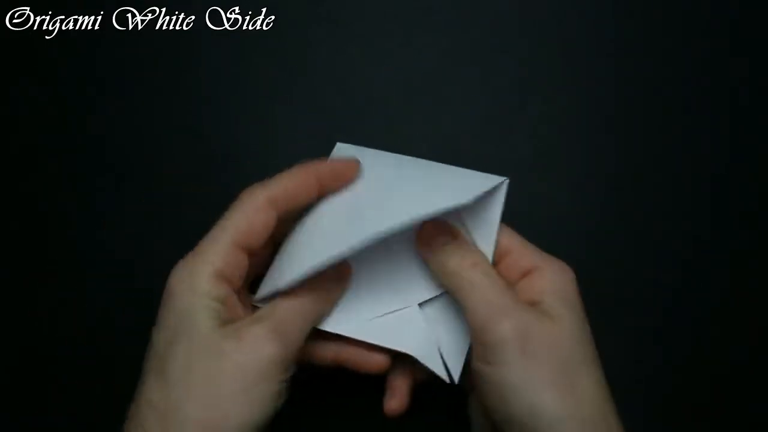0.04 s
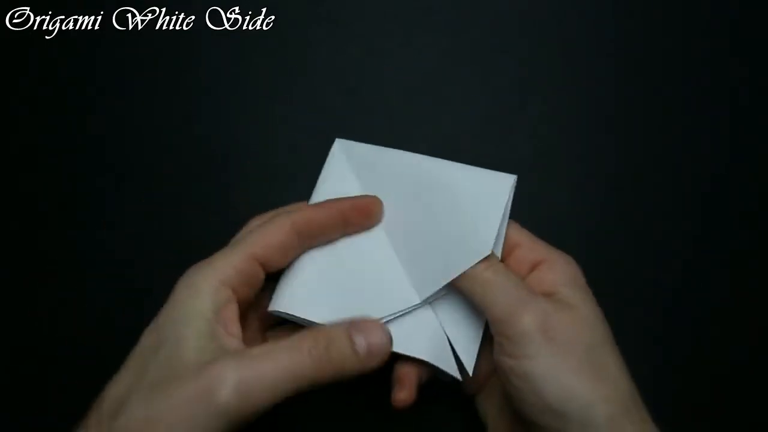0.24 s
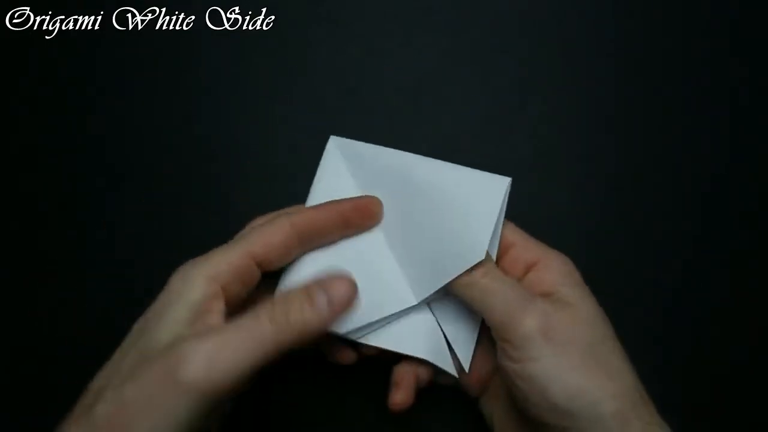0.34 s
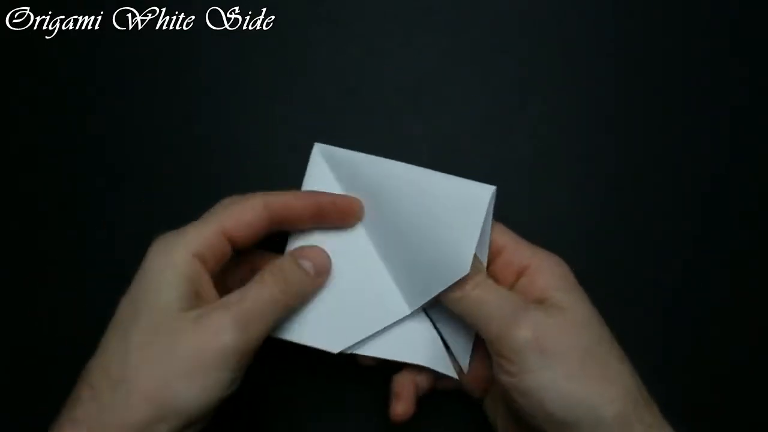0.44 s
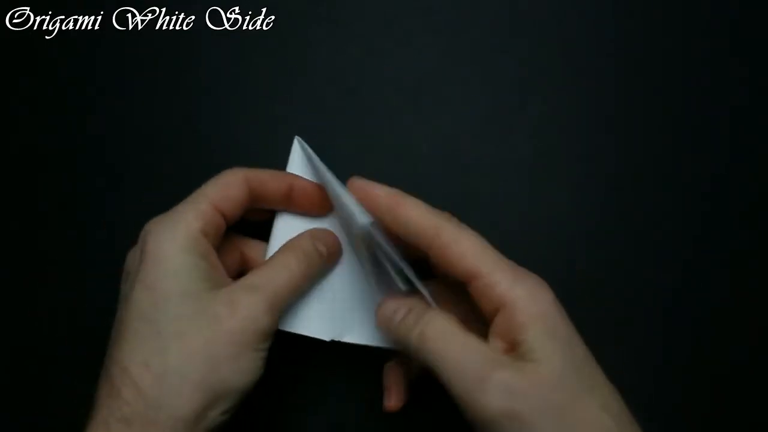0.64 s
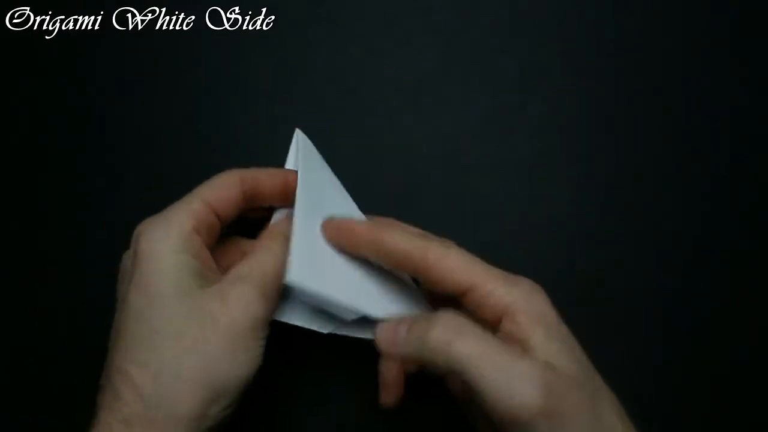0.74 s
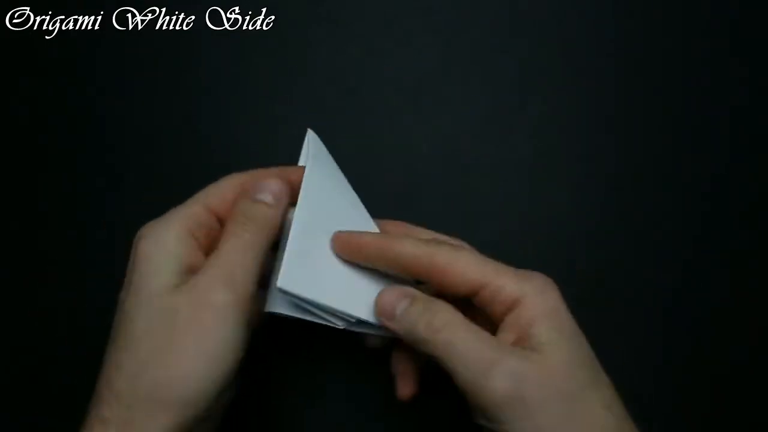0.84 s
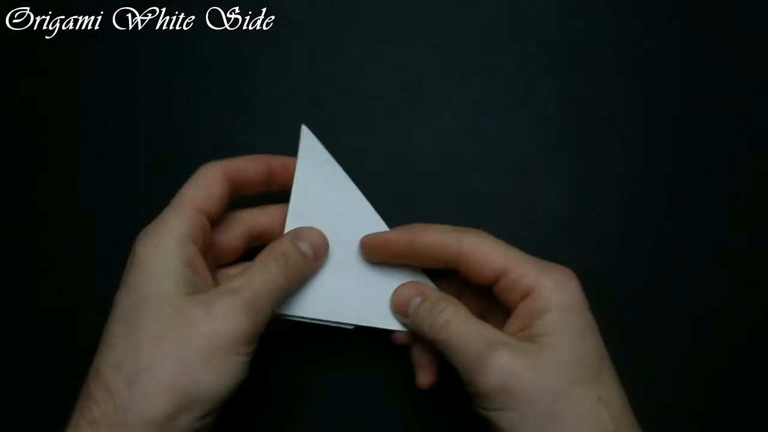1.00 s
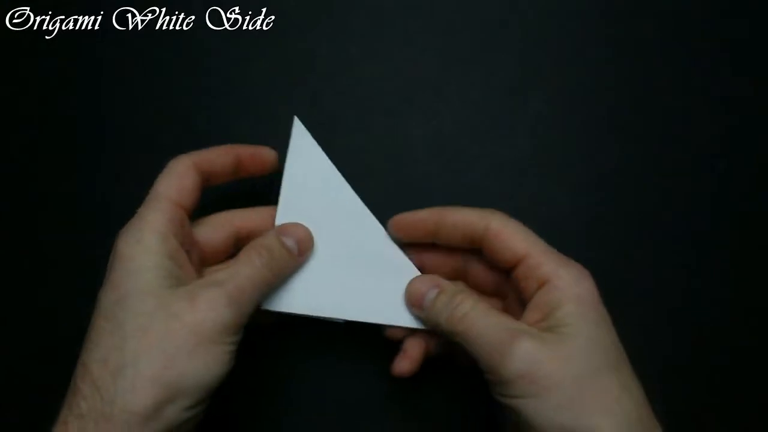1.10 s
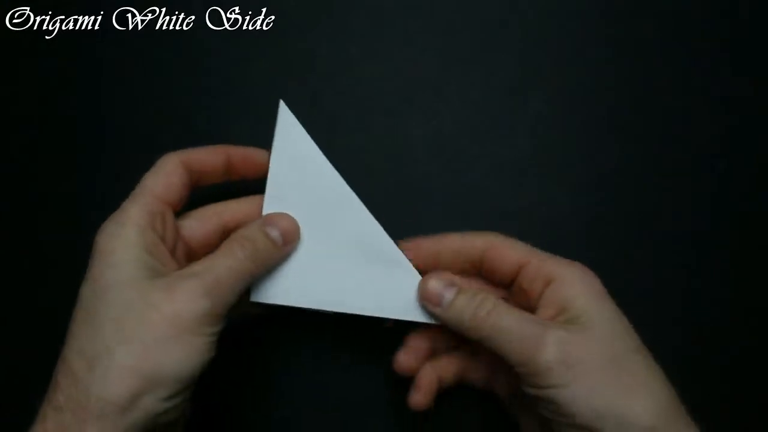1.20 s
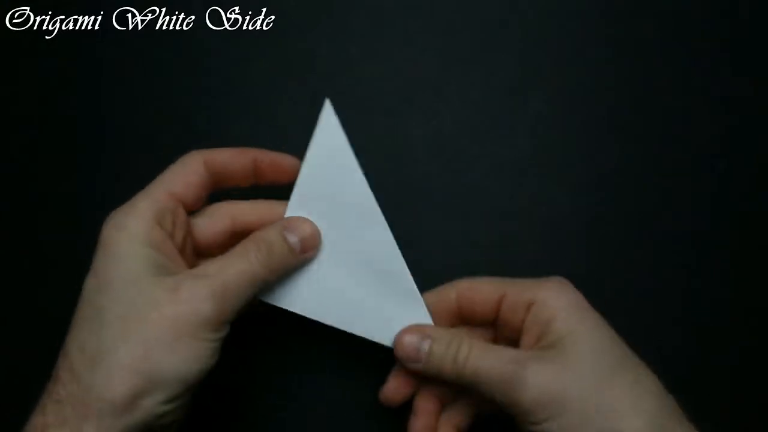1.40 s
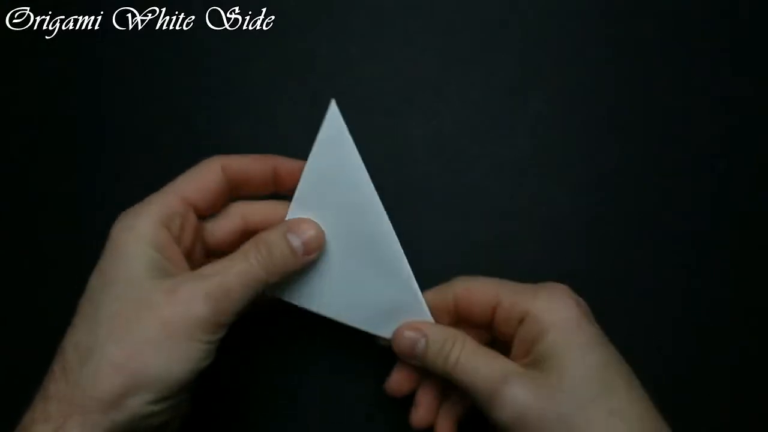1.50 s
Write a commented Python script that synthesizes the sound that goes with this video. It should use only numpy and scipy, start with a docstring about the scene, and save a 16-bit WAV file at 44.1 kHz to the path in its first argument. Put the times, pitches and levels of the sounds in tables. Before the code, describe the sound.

Paper crinkling and snapping as hands squeeze and refold a small folded paper shape

```python
"""In a small quiet room, a folded paper toy is squeezed shut and refolded by hand, close to the microphone.
Sliding skin and paper hiss as grainy filtered noise; wrinkles crackle, and finger pads tap the open pocket.
Broad panels flex with soft low plops, creases buckle in dry snaps (a kick and a rattle heard through a panel);
the loudest is a flap popping through. Flaps scuff as swelling noise, the hollow fold knocks as three decaying
tones, tight layers squeak as wavering tones. Narrow peaks colour it all, over a short room and faint noise."""
import sys
import numpy as np
from scipy import signal
from scipy.fft import rfft, irfft, next_fast_len
from scipy.io import wavfile
from scipy.ndimage import map_coordinates

SR = 44100
rng = np.random.default_rng(int(sys.argv[2]) if len(sys.argv) > 2 else 0)


def master(y):
    """Save y as 16-bit WAV."""
    cut = np.clip(np.atleast_2d(y).T, -1, 1)
    pcm = np.round(cut * 32767)  # scale
    wavfile.write(sys.argv[1], SR, pcm.astype(np.int16))


N = 68355  # length in samples

# All handling levels are ahead of the shared colour peaks, which change them further.
# Treble of the sliding, before its unsteadiness. Each row: time in seconds, level in dB.
SLIDE_HISS_LEVEL = [(0, -48), (.03, -55.5), (.06, -61.5), (.125, -61.5), (.155, -48.5), (.27, -47),
                    (.335, -39), (.362, -41), (.385, -50), (.455, -67), (.48, -56.5), (.525, -52.5),
                    (.555, -42), (.595, -52.5), (.63, -44), (.655, -51.5), (.68, -46.5), (.795, -43.5),
                    (.815, -51.5), (.94, -49), (.975, -46.5), (1.03, -52), (1.09, -48.5), (1.12, -53),
                    (1.17, -44.5), (1.21, -50.5), (1.265, -55.5), (1.3, -55.5), (1.325, -72), (1.4, -73.5),
                    (1.445, -63), (1.5, -67.5), (1.55, -60.5)]
# Middle range of the sliding, before its unsteadiness. Each row: time in seconds, level in dB.
SLIDE_BODY_LEVEL = [(0, -52), (.035, -54), (.06, -64.5), (.12, -67), (.165, -46), (.24, -44), (.3, -47),
                    (.34, -39.5), (.38, -43), (.42, -52.5), (.452, -59), (.49, -46.5), (.595, -46),
                    (.63, -43), (.655, -47), (.675, -42), (.73, -48), (.8, -38), (.825, -52), (.93, -50.5),
                    (.98, -45.5), (1.04, -54), (1.065, -48.5), (1.14, -46), (1.2, -42.5), (1.24, -67),
                    (1.29, -54), (1.335, -66.5), (1.385, -75), (1.45, -61.5), (1.51, -71), (1.55, -70.5)]
# Low rustle of the open pocket, before its unsteadiness. Each row: time in seconds, level in dB.
SLIDE_HOLLOW_LEVEL = [(0, -47), (.046, -52), (.115, -57), (.16, -52), (.22, -51.5), (.3, -55.5),
                      (.345, -40.5), (.372, -36.5), (.41, -51), (.48, -81), (.53, -57.5), (.555, -56.5),
                      (.61, -47.5), (.66, -57), (.75, -60.5), (.8, -50), (.83, -62.5), (.96, -51),
                      (1.1, -73), (1.22, -54), (1.38, -73), (1.55, -69)]
# Spectra of those three layers. Each row: frequency in Hz, relative density in dB per Hz.
HISS_SPECTRUM = [(100, -64), (2500, -32), (4500, -2), (5800, 2.5), (7500, 3.5), (10000, 2.5), (13000, 3),
                 (15000, -4), (16000, -14.5)]
BODY_SPECTRUM = [(60, -46.5), (200, -35.5), (600, -22.5), (1200, -9), (1700, 0.5), (2300, 0.5),
                 (2750, -1.5), (3150, 2.5), (4000, 0), (5000, -8), (8000, -38)]
HOLLOW_SPECTRUM = [(60, -32), (200, -35), (340, -10), (480, -8.5), (600, -11.5), (740, -5.5), (1020, -3.5),
                   (1400, -4), (1900, -7), (2400, -19), (6000, -45.5)]
GRAINS_PER_S, GRAIN_SPREAD_DB = 1800, 3
GRAIN_SHARE = 0.33  # share of the friction's power, before its spectrum

# Tiny crackles, their level set against the middle range of the sliding.
CRACKLE_DB, CRACKLE_SPREAD_DB, CRACKLE_HZ, CRACKLE_OCTAVES = 14, 4, 2400, 0.52

# Finger pads on the open pocket. Each row: start in seconds, level in dB, tilt in dB per octave
# (from 500 to 2000 Hz), t60 of the flutter in seconds.
TAPS = [(.0507, -40, -7.5, 0.0074), (.0657, -39.5, -9, 0.0072), (.088, -35.5, -5, 0.024),
        (0.1322, -41.5, 4, 0.0094), (.151, -35.5, 14, .015), (1.4642, -44, 8, 0.016)]
# A soft pad gives no treble. Each row: frequency in Hz, gain in dB.
TAP_SPECTRUM = [(150, -36), (540, -47), (760, 10.5), (1800, 10.5), (2250, -23), (6000, -42)]
TAP_RATTLE_DB = -0.5  # against the kick

# Panels flexing; the broader, the lower. Each row: start in seconds, level in dB, pitch in Hz.
PLOPS = [(.088, -49.5, 310), (0.133, -51.5, 330), (.151, -38, 388), (0.2332, -31, 351), (0.327, -39, 357),
         (.358, -31.5, 642), (0.544, -39.5, 363), (0.606, -52, 577), (.677, -44, 633), (0.78, -54, 366),
         (0.797, -50.5, 355), (.958, -34, 661), (1.219, -45, 766)]
PLOP_SWELL_S, PLOP_ROUGH_RAD = 0.0039, 0.24
PUFF_DB, PUFF_T60_S = -26.5, 0.13  # level against the plop
# Air squeezed out of the folds. Each row: frequency in Hz, relative level in dB.
PUFF_SPECTRUM = [(25, -28), (60, -13.5), (130, 7.5), (200, -3.5), (320, 8.5), (600, -9), (2000, -68.5)]

# Crease snaps. Each row: time of the kick in seconds, level in dB, panel pitch in Hz, sharpness Q,
# crack against the panel in dB, rattle against the kick in dB, t60 of the rattle in seconds.
SNAPS = [(0.2083, -29.5, 1820, 6.6, -23, -9, 0.0081), (0.2131, -28.5, 1020, 0.71, -20, 5.5, 0.024),
         (0.2315, -29, 1555, 2.1, -8, 7, 0.012), (.234, -32, 2400, 1.3, -23, 26, 0.028),
         (0.258, -34.5, 1150, 1.9, -30, 31, 0.014), (0.346, -25.5, 1890, 0.85, -24, 7, 0.03),
         (.3575, -17.5, 1180, 1.78, -24, -16, 0.009), (.544, -27.5, 1600, 0.78, -36, -2, 0.006),
         (0.5541, -30.5, 2680, 1.04, -14, 1, 0.0095), (0.5795, -29, 1800, 0.64, -16, 0.5, 0.017),
         (0.6791, -37, 1900, 0.62, -11, -5, 0.0071), (0.851, -38.5, 1520, 1.5, -16, -4.5, 0.02),
         (.878, -25.5, 1550, 0.86, -18, -1, 0.0077), (0.9146, -37, 2450, 1.3, -4.5, -5, 0.013),
         (0.959, -11.5, 2210, 5.7, -4.5, 4, 0.016), (0.9597, -15, 1370, 2.85, -3.5, 7.5, 0.0086),
         (1.0665, -41, 1800, 3.7, -9, 18, 0.013), (1.159, -29, 3020, 1.02, -28, -2.5, 0.004),
         (1.16, -35, 1200, 2.5, -5, 5.5, 0.015), (1.2128, -29, 1140, 2.9, -5.5, 3, 0.028),
         (1.2145, -28, 2740, 2.1, -14, -9, 0.013), (1.2333, -23.5, 2640, 2.2, -8, 5, 0.013),
         (1.2499, -24.5, 2400, 1.17, -18.5, -4.5, 0.019), (1.4216, -46, 3080, 8.2, -12, 2, 0.016)]
# Broad crack of the sheet. Each row: frequency in Hz, gain in dB.
CRACK_SPECTRUM = [(100, -40.5), (400, -33.5), (720, -4), (1020, -5), (1400, -7.5), (3000, -5), (4200, 1.5),
                  (6000, -5), (9000, -3), (13000, -10), (16000, -26)]
# How a small panel radiates. Each row: frequency in Hz, gain in dB.
RADIATION = [(50, -29), (300, -9.5), (500, -1.5), (750, 4), (4000, 4), (12000, 6.5)]
HIT_FRAME_S, RATTLE_RISE_S = 0.002, 0.0008  # snap and tap levels are rms over this frame
STRAIN_DB, STRAIN_S = -14, 0.0018  # fibres giving way before a snap: level against the kick, growth time

# Flaps passing each other. Each row: release in seconds, rise in seconds, level in dB, panel pitch in Hz,
# sharpness Q, crack against the panel in dB.
SCUFFS = [(0.34, 0.0051, -39, 2220, 4.4, -17), (0.348, 0.0045, -37, 1280, 1.8, 1),
          (.363, 0.016, -22, 1186, 2, -14.5), (.366, 0.02, -24, 2850, 2.6, -4.5),
          (0.3868, .009, -31, 1670, 1.7, -26), (.551, 0.014, -32, 1820, 0.81, -33),
          (0.797, 0.014, -29, 2750, 1.23, -6), (.799, 0.01, -40, 913, 4.7, -38.5),
          (0.876, 0.0063, -39, 1090, 1.4, -10.5)]
RELEASE_S = 0.012  # t60 after a scuff or squeak lets go

# Knocks on the hollow fold. Each row: start in seconds, level in dB, pitch as a ratio to the modes.
KNOCKS = [(.546, -30, 1.01), (.578, -36.5, 1.03), (1.2115, -42, .99)]
# Modes of the hollow fold. Each row: frequency in Hz at ratio 1, relative level in dB, t60 in seconds.
FOLD_MODES = [(736, -0.5, 0.044), (1007, -5.5, 0.042), (1328, -1, 0.052)]

# Paper squeaking on paper. Each row: release in seconds, rise in seconds, level in dB, mean pitch in Hz,
# waver as a share of the pitch.
SQUEAKS = [(0.793, 0.019, -31.5, 3084, .05), (1.425, 0.034, -64, 3030, 0.0058),
           (1.468, 0.042, -57.5, 3180, 0.033), (1.534, 0.076, -77, 4490, .002)]
SQUEAK_WAVER_PER_S, SQUEAK_OVERTONE_DB = 810, -18

# Narrow lifts in the colour of all handling. Each row: frequency in Hz, lift in dB before the overall gain.
COLOUR_PEAKS = [(338, 3.5), (988, 4), (1356, 2.5), (1762, -0.5), (2273, 2), (2566, 5), (3093, 3),
                (3970, 1.5), (5650, 4)]
COLOUR_Q, COLOUR_DB = 20.7, -1.31  # sharpness of the lifts, overall gain

# Decay of the room. Each row: frequency in Hz, t60 in seconds.
ROOM_T60 = [(200, 0.32), (600, 0.21), (1500, 0.18), (4000, 0.11), (12000, 0.054)]
ROOM_DB = -15.5
# Faint steady noise. Each row: frequency in Hz, relative density in dB per Hz.
FLOOR_SPECTRUM = [(25, -31), (100, -1.5), (300, 6.5), (1000, 3.5), (3000, -3), (8000, -7), (15000, -37)]
FLOOR_DB = -72
TOP_HZ = 15900  # band limit of the recorder


def amp(db):
    """Decibels to gain."""
    return 10 ** (np.asarray(db) / 20)


def unit(x):
    """Scale to rms 1."""
    return x / np.sqrt(np.mean(x ** 2) + 1e-20)


def unit_energy(x):
    """Scale to a sum of squares of 1."""
    return x / np.linalg.norm(x)


def decay(t, t60):
    """Exponential decay by 60 dB in t60 seconds."""
    return np.exp(-np.log(1000) * t / t60)


def along(points, hz):
    """Read (Hz, value) points on a log frequency axis."""
    f, v = np.transpose(points)
    return np.interp(np.log(hz + 1), np.log(f + 1), v)


def level(points):
    """Turn (s, dB) points into one gain per sample."""
    s, db = np.transpose(points)
    return amp(np.interp(np.arange(N) / SR, s, db))


def wobble(rate):
    """A smooth random curve with rate knots a second."""
    return map_coordinates(rng.standard_normal(2048), [np.arange(N) * rate / SR], mode="mirror")


def coloured(x, gain):
    """Filter x by a gain over frequency, causally: the folded cepstrum gives minimum phase."""
    m = 2 * next_fast_len(len(x))
    log_gain = np.log(np.maximum(gain(np.fft.rfftfreq(m, 1 / SR)), 1e-6))
    cepstrum = irfft(log_gain, m)
    cepstrum[1:m // 2] *= 2
    cepstrum[m // 2 + 1:] = 0
    return irfft(rfft(x, m) * np.exp(rfft(cepstrum)), m)[:len(x)]


def shaped(x, spectrum):
    """Give x a (Hz, dB) colour, at rms 1."""
    return unit(coloured(x, lambda hz: amp(along(spectrum, hz))))


def add(track, s, sound):
    """Mix a sound in at s seconds."""
    part = track[max(round(s * SR), 0):][:len(sound)]
    part += sound[:len(part)]


def paper(force, pitch_hz, q, crack_db):
    """A force heard through the band in which one panel rings and the broad crack of the sheet."""
    def gain(hz):
        detuning = q * (hz / pitch_hz - pitch_hz / (hz + 1))
        panel = amp(along(RADIATION, hz)) / np.hypot(1, detuning ** 2)
        crack = amp(crack_db + along(CRACK_SPECTRUM, hz))
        return np.hypot(panel, crack)
    return coloured(force, gain)


def swell(t, rise_s):
    """Pressure builds by 20 dB over the rise and lets go at t = 0."""
    return amp(np.where(t < 0, -20 * (t / rise_s) ** 2, -60 * t / RELEASE_S))


def friction(spectrum):
    """Fibres catching and slipping: tiny uneven clicks over a smooth rush."""
    catches = rng.random(N) < GRAINS_PER_S / SR
    signs = rng.choice([-1, 1], N)
    size_db = GRAIN_SPREAD_DB * np.minimum(rng.exponential(size=N), 4)
    grains = catches * signs * amp(size_db)
    rush = rng.standard_normal(N)
    mix = np.sqrt(GRAIN_SHARE) * unit(grains) + np.sqrt(1 - GRAIN_SHARE) * rush
    return shaped(mix, spectrum)


def sliding(hiss_jitter_db=1.53, body_jitter_db=-1.9, hollow_jitter_db=2):
    """Skin and paper slide over paper under unsteady pressure, which lifts the hiss as it lowers the body."""
    pressure = wobble(94.55)
    hiss = level(SLIDE_HISS_LEVEL) * amp(hiss_jitter_db * pressure) * friction(HISS_SPECTRUM)
    body = level(SLIDE_BODY_LEVEL) * amp(body_jitter_db * pressure) * friction(BODY_SPECTRUM)
    hollow = level(SLIDE_HOLLOW_LEVEL) * amp(hollow_jitter_db * wobble(130)) * friction(HOLLOW_SPECTRUM)
    return hiss + body + hollow


def crackles(count=110):
    """Small wrinkles tick at random while the layers slide, each at its own pitch."""
    out, effort, kick = np.zeros(N), level(SLIDE_BODY_LEVEL), signal.unit_impulse(256)
    for when, size, pitch in rng.random((count, 3)):
        at = int(when * N)
        pitch_hz = CRACKLE_HZ * 2 ** (CRACKLE_OCTAVES * (2 * pitch - 1))
        tick = paper(kick, pitch_hz, q=1.8, crack_db=-16)
        db = CRACKLE_DB + CRACKLE_SPREAD_DB * min(-np.log(1 - size), 2)  # few large, many small
        add(out, at / SR, amp(db) * effort[at] * unit_energy(tick))
    return out


def taps():
    """A soft finger pad lands on the pocket: a dull tick and a short flutter."""
    out, t = np.zeros(N), np.arange(2048) / SR
    for s, db, tilt_db, t60 in TAPS:
        rattle = rng.standard_normal(len(t)) * decay(t, t60) * (1 - np.exp(-t / RATTLE_RISE_S))
        force = (t == 0) + amp(TAP_RATTLE_DB) * unit_energy(rattle)

        def pad(hz):
            octaves = np.log2(np.clip(hz / 1000, .5, 2))
            return amp(along(TAP_SPECTRUM, hz) + tilt_db * octaves)
        tap = coloured(force, pad)
        add(out, s, amp(db) * np.sqrt(HIT_FRAME_S * SR) * unit_energy(tap))
    return out


def plops():
    """A broad panel flips over with a short, rough, low knock and a puff of air."""
    out, t = np.zeros(N), np.arange(4096) / SR
    u = t / PLOP_SWELL_S
    for s, db, pitch_hz in PLOPS:
        phase = 2 * np.pi * pitch_hz * t + PLOP_ROUGH_RAD * wobble(235)[:len(t)]
        note = np.sin(phase) * (u * np.exp(1 - u)) ** 2
        air = shaped(rng.standard_normal(len(t)), PUFF_SPECTRUM)
        puff = air * decay(t, PUFF_T60_S) * (1 - np.exp(-u)) ** 2
        add(out, s, amp(db) * (note + amp(PUFF_DB) * puff))
    return out


def snaps():
    """A crease strains and buckles: one kick, then bending waves that rattle out within milliseconds."""
    out, t = np.zeros(N), np.arange(-256, 2048) / SR  # the kick is at t = 0
    after = np.maximum(t, 0)
    for s, db, pitch_hz, q, crack_db, rattle_db, t60 in SNAPS:
        noise = rng.standard_normal(len(t))
        strain = noise * (t < 0) * np.exp(-np.abs(t) / STRAIN_S)
        rattle = noise * decay(after, t60) * (1 - np.exp(-after / RATTLE_RISE_S))
        force = (t == 0) + amp(rattle_db) * unit_energy(rattle) + amp(STRAIN_DB) * unit_energy(strain)
        snap = paper(force, pitch_hz, q, crack_db)
        add(out, s + t[0], amp(db) * np.sqrt(HIT_FRAME_S * SR) * unit_energy(snap))
    return out


def scuffs(ragged_db=0.0):
    """An edge drags noisily over a panel, ever harder, then lets go."""
    out, t = np.zeros(N), np.arange(-4096, 4096) / SR  # the release is at t = 0
    for s, rise_s, db, pitch_hz, q, crack_db in SCUFFS:
        force = rng.standard_normal(len(t)) * amp(ragged_db * wobble(900)[:len(t)])  # even drag at 0 dB
        drag = paper(force, pitch_hz, q, crack_db)
        add(out, s + t[0], amp(db) * swell(t, rise_s) * unit(drag))
    return out


def knocks(attack_s=0.0026):
    """Layers clap together and the hollow fold rings briefly in its modes."""
    out, t = np.zeros(N), np.arange(4096) / SR
    for s, db, ratio in KNOCKS:
        ring = np.zeros(len(t))
        for hz, mode_db, t60 in FOLD_MODES:
            ring += amp(mode_db) * np.sin(2 * np.pi * ratio * hz * t) * decay(t, t60)
        add(out, s, amp(db) * ring * (1 - np.exp(-t / attack_s)) ** 2)
    return out


def squeaks(flutter_db=3):
    """Tight layers stick and slip at a nearly steady rate: a wavering tone and its octave, fluttering."""
    out, t = np.zeros(N), np.arange(N) / SR
    for s, rise_s, db, pitch_hz, waver in SQUEAKS:
        slip_rate_hz = pitch_hz * (1 + waver * wobble(SQUEAK_WAVER_PER_S))
        phase = 2 * np.pi * np.cumsum(slip_rate_hz) / SR
        tone = np.sin(phase) + amp(SQUEAK_OVERTONE_DB) * np.sin(2 * phase)
        fluttering = tone * amp(flutter_db * wobble(170))
        out += amp(db) * swell(t - s, rise_s) * unit(fluttering)
    return out


def peaked(x):
    """Narrow peaks colour all the handling a little."""
    def gain(hz):
        lift_db = sum(db / (1 + (2 * COLOUR_Q * (hz / peak_hz - 1)) ** 2) for peak_hz, db in COLOUR_PEAKS)
        return amp(COLOUR_DB + lift_db)
    return coloured(x, gain)


def room(x):
    """The short answer of the room: noise whose treble dies first."""
    hz, t, bands = signal.stft(rng.standard_normal(SR // 3), SR, nperseg=256)
    fading = bands * decay(t, along(ROOM_T60, hz)[:, None])
    tail = signal.istft(fading, SR, nperseg=256)[1]
    tail = np.pad(tail, (128, 0))  # a short gap ahead of the tail
    return signal.fftconvolve(x, unit_energy(tail))[:N]


def scene():
    """The toy close to the microphone, its room and a faint steady noise."""
    touches = sliding() + crackles() + snaps() + taps() + knocks() + scuffs() + squeaks() + plops()
    handling = peaked(touches)
    floor = amp(FLOOR_DB) * shaped(rng.standard_normal(N), FLOOR_SPECTRUM)
    return (handling + amp(ROOM_DB) * room(handling) + floor)[None]


def record(dry):
    """The recorder keeps nothing above its band limit."""
    m = next_fast_len(N + 8192)
    kept = np.fft.rfftfreq(m, 1 / SR) < TOP_HZ
    return irfft(rfft(dry, m) * kept, m)[:, :N]


dry = scene()
out = record(dry)
master(out)
```